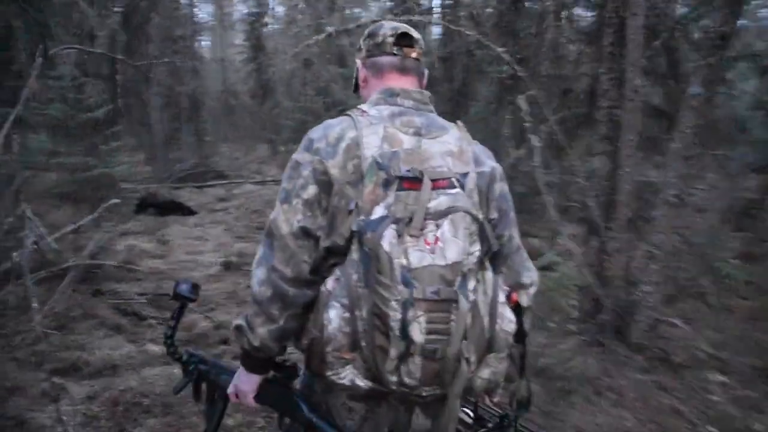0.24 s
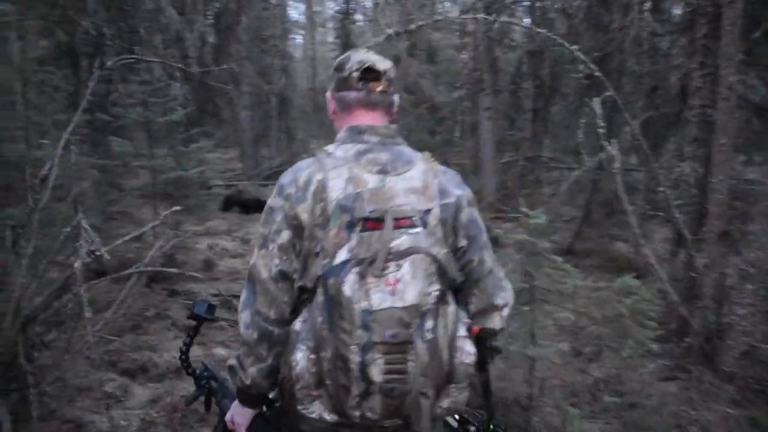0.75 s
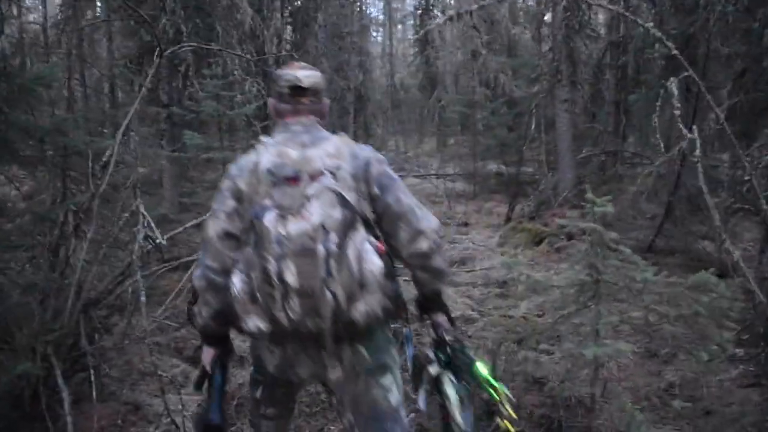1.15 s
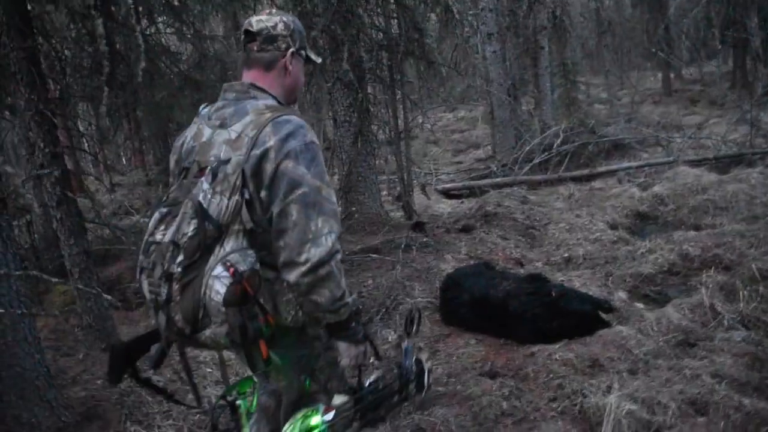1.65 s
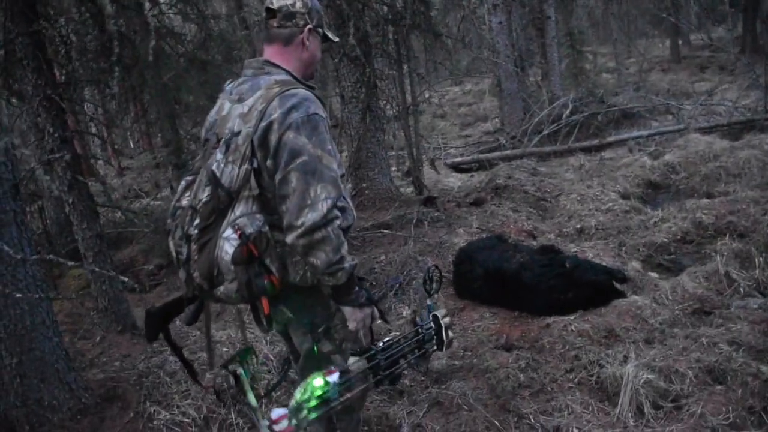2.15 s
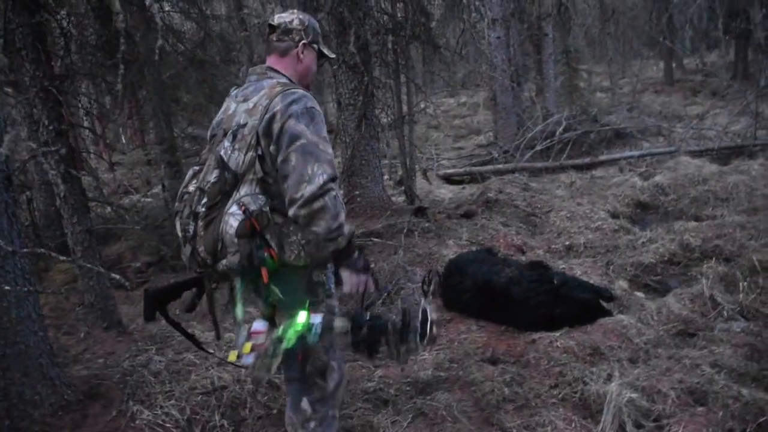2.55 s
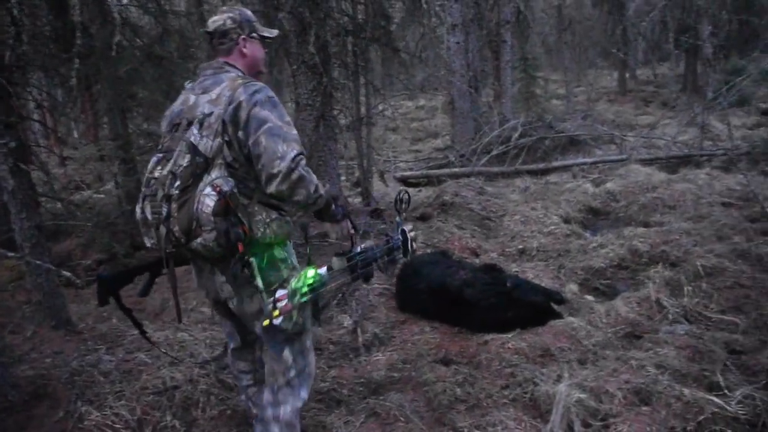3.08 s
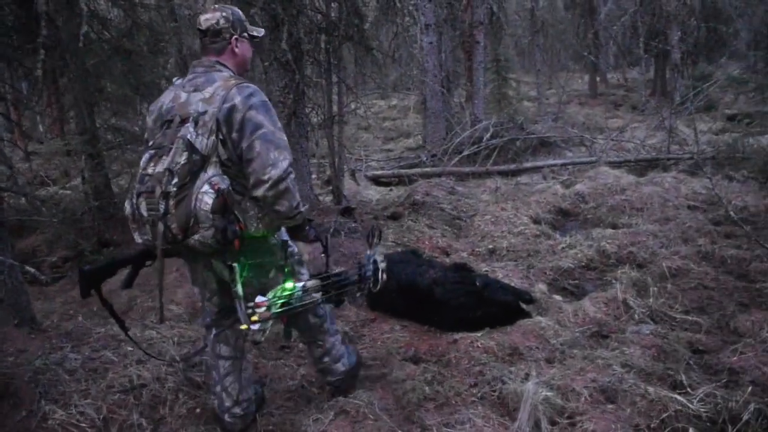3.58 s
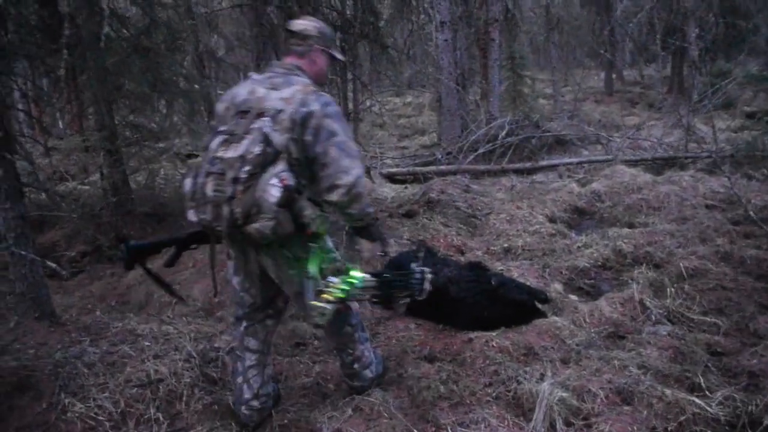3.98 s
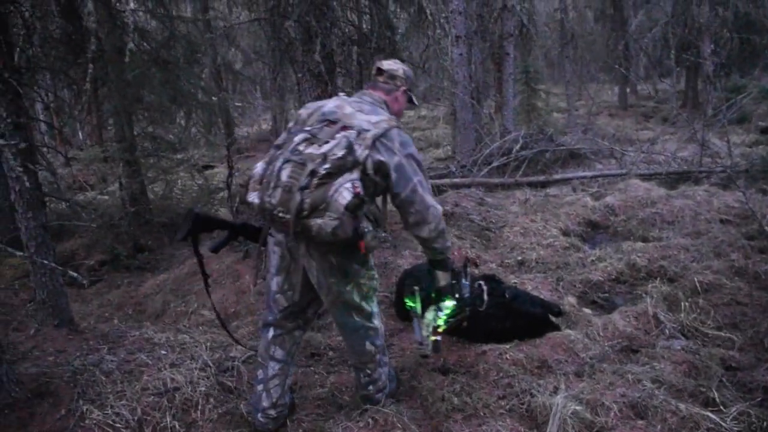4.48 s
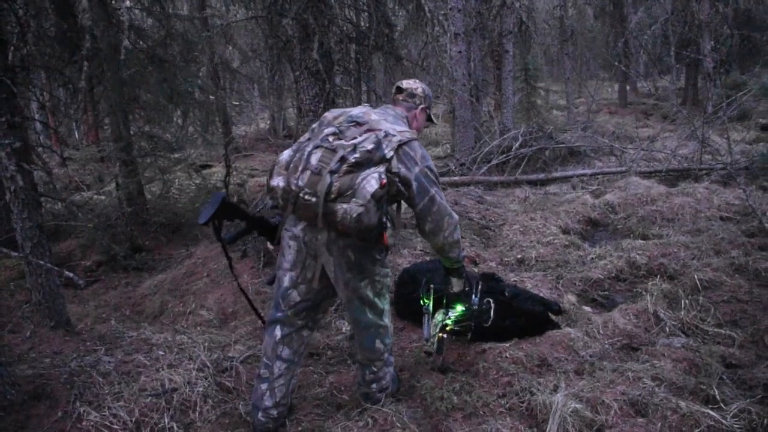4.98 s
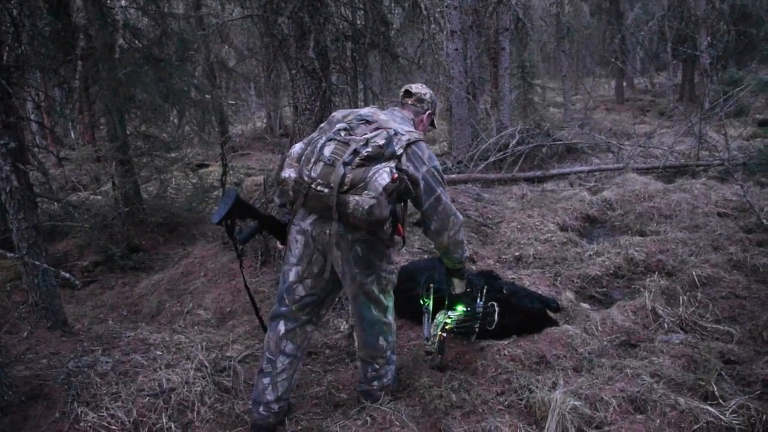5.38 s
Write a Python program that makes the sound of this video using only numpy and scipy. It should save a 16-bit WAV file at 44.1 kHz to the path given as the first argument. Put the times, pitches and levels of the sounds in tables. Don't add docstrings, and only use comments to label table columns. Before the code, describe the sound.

A hunter walks through dry grass and twigs in a quiet forest, just ahead of a hand-held camera. A very loud twig snap opens, followed by dense crunching and cracking and a second heavy snap near one second. Soft heel thumps and fainter rustles follow as the brush thins. Low handling rumble and thuds sit close at the microphone; late snaps and small strap squeaks end it over faint hiss.

```python
import sys
import numpy as np
from scipy import signal
from scipy.fft import rfft, irfft
from scipy.io import wavfile

SR = 44100
rng = np.random.default_rng(int(sys.argv[2]) if len(sys.argv) > 2 else 0)


def master(y):
    cut = np.clip(np.atleast_2d(y).T, -1, 1)
    pcm = np.round(cut * 32767)
    wavfile.write(sys.argv[1], SR, pcm.astype(np.int16))


def attenuation_scalar(level_db):
    decades = np.asarray(level_db, float) / 20
    return 10 ** decades


N = 248283

# f/Hz, width/Hz, gain
PORT = (3290, 650, 1.212)
# t/s, peak level/dB, knock level re peak/dB, knock f/Hz
MORE_KNOCKS = [
    (4.4503, -39, 8.4, 300),
    (4.4136, -32, 8, 260),
    (5.1036, -42, 6.7, 270),
    (5.1339, -43, 7.6, 310),
    (5.2, -44, 7.1, 340),
]


def rms_one(x):
    return x / np.sqrt(np.mean(x ** 2) + 1e-20)


def peak_one(x):
    return x / (np.max(np.abs(x)) + 1e-20)


def band(x, low_hz, high_hz, order=2):
    edges_hz = [low_hz, min(high_hz, .45 * SR)]
    return signal.sosfilt(signal.butter(order, edges_hz, "band", fs=SR, output="sos"), x)


def resonance(x, hz, width_hz):
    r = np.exp(-np.pi * width_hz / SR)
    zeros = np.array([1, 0, -1]) * (1 - r * r) / 2
    poles = [1, -2 * r * np.cos(2 * np.pi * hz / SR), r * r]
    return signal.lfilter(zeros, poles, x)


def drift(rate):
    r = np.exp(-80 * np.pi * rate / SR)
    white = rng.standard_normal(N // 40 + 2002)
    slow = signal.lfilter([1], [1, -2 * r, r * r], white)[2000:]
    return np.interp(np.arange(N) / 40, np.arange(len(slow)), rms_one(slow))


def coloured(spectrum):
    hz = np.fft.rfftfreq(N, 1 / SR) + 1
    points = np.array(spectrum)
    gain_db = np.interp(np.log(hz), np.log(points[:, 0]), points[:, 1])
    return rms_one(irfft(rfft(rng.standard_normal(N)) * attenuation_scalar(gain_db), N))


def grains(per_s, spread_db, clump_db):
    sizes = attenuation_scalar(spread_db * np.minimum(rng.exponential(1, N), 3.0)) * rng.choice([-1, 1], N)
    born = rng.random(N) < per_s * attenuation_scalar(clump_db * drift(45)) / SR
    return rms_one(sizes * born) + 0.32 * rng.standard_normal(N)


def crackle(per_s, low_hz, high_hz, cycles, count):
    clicks = grains(per_s, 4.6, 4.2)
    dealt = rng.integers(0, count, N)
    gust_db, tilt = 2.2, .45
    out = np.zeros(N)
    for k, hz in enumerate(np.geomspace(low_hz, high_hz, count)):
        stalk = resonance(clicks * (dealt == k), hz, hz / cycles)
        out += attenuation_scalar(gust_db * drift(9.4)) * stalk / (hz / low_hz) ** tilt
    return out


def swells(s, db, hold_s, rise_s, fade_db_per_s):
    since = np.arange(0, N + 64, 64)[:, None] / SR - s
    rise_db = 20 * np.minimum(since, 0) / rise_s
    fade_db = fade_db_per_s * np.maximum(since - hold_s, 0)
    total = 10 * np.log10(np.sum(attenuation_scalar(2 * (db + rise_db - fade_db)), axis=1) + 1e-9)
    return np.interp(np.arange(N) / 64, np.arange(len(total)), total)


def air():
    # f/Hz, level per Hz/dB
    spectrum = [(12, -36.5), (20, -12), (79, 3), (91, -13), (124, -3.5), (146, -19), (242, -11.5),
                (501, -21), (1100, -26.5), (3100, -24), (4850, -33), (12200, -29), (16200, -28)]
    return attenuation_scalar(-64) * coloured(spectrum)


def camera():
    # f/Hz, width/Hz, level/dB
    modes = [(117.4, 19, -11.5), (243.5, 46.3, 2.5), (312, 22, -2)]
    # f/Hz, level per Hz/dB
    rumble_spectrum = [(8.8, -29), (15, -0.5), (43, 1.5), (62, -13.5), (86, -12), (135, -16), (180, -17),
                       (230, -38), (400, -120)]
    # t/s, sway level/dB, rubbing level/dB, hold/s
    jolts = [(0.01, -53, -63, 0.33), (0.45, -56.5, -68, 0.65), (0.962, -48, -51.5, 0.046),
             (1.124, -57, -59, 0.13), (1.372, -46, -58, 0.021), (1.653, -52, -60.5, 0.056),
             (1.875, -48, -67, 0.032), (2.052, -44.5, -62.5, 0.037), (2.177, -49, -63.5, 0.047),
             (2.417, -47.5, -62, 0.024), (2.913, -49.5, -59, 0.033), (3.308, -54, -63, 0.03),
             (3.6, -51.5, -62, 0.055), (3.956, -57.5, -61.5, 0.06), (4.31, -66.5, -67.5, 0.23),
             (4.672, -62.5, -65, 0.2), (5.065, -84, -63, 0.12), (5.244, -57.5, -72.5, 0.029)]
    # t/s, peak level/dB, upper mode level re peak/dB
    bumps = [(1.43, -53, -13), (1.509, -54, -15), (1.658, -52.5, -10.5), (1.798, -49, -4),
             (1.872, -53, -4.5), (2.018, -47, -4), (2.08, -53.5, -25), (2.135, -47, -28), (2.384, -50, -10),
             (2.972, -51.5, -16), (3.05, -50.5, -30.5), (3.171, -59.5, -5.5), (3.662, -52, -18),
             (4.55, -58, -6), (4.698, -65.5, 9), (4.867, -53, 1.5), (4.952, -55, -1), (5.075, -47.5, 4)]
    rise_s, fade_db_per_s, sway_hz = 0.1787, 73, 31.4
    at_s, jolt_db, rub_db, hold_s = np.transpose(jolts)
    sway_db = swells(at_s, jolt_db, hold_s, rise_s, fade_db_per_s)
    body_db = swells(at_s, rub_db, hold_s, rise_s, fade_db_per_s)

    turn = 2 * np.pi * np.cumsum(sway_hz * attenuation_scalar(1.3 * drift(6.1))) / SR
    sway = drift(11.0) * np.cos(turn) + drift(7.2) * np.sin(turn)
    rumble = sway + 1.4 * coloured(rumble_spectrum)

    rubbing = grains(90, 4.5, 3.0)
    body = np.zeros(N)
    for hz, width_hz, db in modes:
        body += attenuation_scalar(db) * resonance(resonance(rubbing, hz, 3 * width_hz), hz, width_hz)

    s, peak_db, upper_db = np.transpose(bumps)
    uneven_db = 3 * rng.standard_normal(len(s))
    thuds = np.zeros(N)
    for (hz, width_hz, db), own_db in zip(modes, [uneven_db, 0, upper_db]):
        taps = np.zeros(N)
        taps[(s * SR).astype(int)] = attenuation_scalar(peak_db + db + own_db)
        softened = resonance(taps, hz, 4 * width_hz)
        thuds += resonance(softened, hz, 0.41 * width_hz) * SR / (1.9 * width_hz)
    return attenuation_scalar(sway_db) * rms_one(rumble) + attenuation_scalar(body_db) * rms_one(body) + thuds


def strap():
    # t/s, length/s
    squeaks = [
        (4.700, .075),
        (4.962, .06),
        (4.661, .021),
        (4.385, .024),
        (4.8615, .004),
        (4.918, .021),
        (5.069, .009),
    ]
    squeak_db = [-31.5, -33.5, -27, -28, -21.5, -31, -20.5]
    slips_per_s = 333
    slips = np.zeros(N)
    for (s, length), db in zip(squeaks, squeak_db):
        k = np.arange(int(length * slips_per_s) + 1)
        early, size = rng.standard_normal((2, len(k)))
        at = s + k / slips_per_s + .000012 * early
        fade_db = 15 * k / (length * slips_per_s)
        slips[(at * SR).round().astype(int)] += attenuation_scalar(db + 14.0 + 2.0 * size - fade_db)
    bright = resonance(resonance(slips, 3360, 735), 3520, 428)
    return bright + 0.033 * resonance(slips, 2460, 900)


def heels():
    # t/s, peak level/dB, start f/Hz
    landings = [
        (0.654, -40.5, 230),
        (0.954, -36.5, 190),
        (1.866, -42.5, 170.3),
        (2.061, -54.5, 170),
        (2.25, -38.5, 227),
        (2.436, -58, 222),
        (2.727, -41, 174),
        (2.904, -45.5, 131.7),
        (3.87, -47, 167),
    ]
    end_hz, sink_s, rise_s, t60_s = 50.6, 0.0133, 0.0027, .09
    t = np.arange(SR // 3) / SR
    out = np.zeros(N + SR)
    for s, db, start_hz in landings:
        sinking_hz = end_hz + (start_hz - end_hz) * np.exp(-t / sink_s)
        turn = 2 * np.pi * np.cumsum(sinking_hz) / SR
        envelope = attenuation_scalar(db - 60 * t / t60_s) * np.minimum(t / rise_s, 1)
        out[int(s * SR):][:len(t)] += envelope * np.sin(turn)
    return out[:N]


def grass():
    # t/s, crunch level/dB, blades level re crunch/dB, press/s
    treads = [(0.068, -42, -12.5, 0.074), (.3, -58.5, -7.5, 0.19), (0.599, -57.5, -3, 0.17),
              (0.869, -52, -21.5, 0.021), (0.959, -47.5, -7.5, 0.032), (1.07, -48, -8, 0.046),
              (1.16, -59, -17, 0.043), (1.25, -50, -0.5, 0.043), (1.32, -54.5, -5, 0.015),
              (1.43, -64.5, -1.5, 0.035), (1.548, -57, 1, 0.015), (1.78, -64.5, -7, 0.015),
              (1.92, -79.5, 8.5, 0.031), (2.05, -72.5, -2.5, 0.085), (2.261, -67.5, -1, 0.019),
              (2.45, -65.5, 4.5, 0.051), (2.71, -66.5, 1, 0.038), (2.921, -72, 0.5, 0.083),
              (3.09, -71.5, 2.5, 0.026), (3.16, -66.5, 3.5, 0.047), (3.34, -70, 0, 0.12),
              (3.55, -80, -6, .02), (3.62, -59.5, -3, 0.076), (3.801, -68.5, 3, 0.18),
              (4.1, -68.5, 3.5, 0.059), (4.42, -58, -3.5, 0.028), (4.47, -59, -3.5, 0.035),
              (4.68, -73.5, -11, 0.03), (4.95, -99, -21, 0.027), (5.11, -66.5, -6, 0.023),
              (1.45, -80, 1, 3.74)]
    # t/s, level/dB, hold/s
    scuffs = [(0.236, -51.5, 0.022), (0.657, -59, 0.017), (0.998, -52.5, 0.022), (1.239, -54, 0.012),
              (1.342, -62.5, 0.039), (1.58, -67, 0.023), (1.733, -67, .03), (1.905, -66.5, 0.013),
              (2.903, -70.5, 0.021), (2.938, -64.5, 0.035), (3.035, -69, .04), (3.671, -64.5, 0.016),
              (4.852, -66.5, 0.0092)]
    sink_s, lift_db_per_s = 0.17, 142
    s, db, fizz_db, press_s = np.transpose(treads)
    crunch_db = swells(s, db, press_s, sink_s, lift_db_per_s)
    blades_db = swells(s, db + fizz_db, press_s + 0.021, sink_s, 203)
    damp_db = -59.5 + 0.44 * (db + 57.5) - 0.6 * (fizz_db + 7.5)
    litter_db = swells(s, damp_db, press_s, sink_s, lift_db_per_s)
    scuff_db = swells(*np.transpose(scuffs), rise_s=0.024, fade_db_per_s=404)
    swish_db = -70.5 + 0.45 * (crunch_db + 68.0)

    scuff = crackle(2500, 480, 850, cycles=3.0, count=4)
    stalks = crackle(1500, 1904, 6300, cycles=3.2, count=6)
    crunch = stalks + PORT[2] * resonance(stalks, PORT[0], PORT[1])
    blades = crackle(3900, 6500, 7900, cycles=1.4, count=6)
    litter = crackle(700, 520, 1500, cycles=0.78, count=4)
    swish = resonance(resonance(rng.standard_normal(N), PORT[0], 2 * PORT[1]), PORT[0], PORT[1])
    layers = [(scuff_db, scuff), (swish_db, swish), (crunch_db, crunch), (blades_db, blades), (litter_db, litter)]
    return sum(attenuation_scalar(level_db) * rms_one(layer) for level_db, layer in layers)


def ticks():
    # t/s, peak level/dB
    splinter_rows = [(0.0787, -35), (0.6199, -32), (0.8436, -35), (0.9085, -33), (1.4131, -36.5),
                     (1.5689, -36), (1.5918, -42.5), (1.8654, -44.5), (1.8844, -51.5), (1.9464, -57),
                     (2.074, -45.5), (2.2347, -45.5), (2.2842, -51), (2.3031, -51), (2.375, -47),
                     (2.407, -58), (2.4704, -36.5), (2.5541, -40), (2.5873, -45), (2.7351, -51),
                     (2.7586, -43), (2.7815, -44), (2.8149, -52), (2.9344, -53.5), (3.1538, -45),
                     (3.4092, -52), (3.7576, -47), (4.0647, -48), (4.1699, -53), (4.2311, -48.5),
                     (4.3038, -52.5), (4.3242, -50), (4.4012, -37), (4.4189, -38), (4.4346, -32),
                     (4.5138, -36), (4.696, -43), (4.9154, -41.5), (4.9317, -49), (5.0368, -52)]
    # t/s, peak level/dB
    blade_rows = [(0.0307, -28), (0.1288, -12), (0.2346, -27), (0.3449, -51), (0.4509, -37), (0.4792, -43),
                  (0.62, -24.5), (0.8892, -26), (0.9098, -39), (1.1784, -26), (1.1997, -30), (1.2564, -33),
                  (1.6079, -48), (1.7351, -48), (2.6153, -33), (2.6435, -41.5), (2.9975, -49.5),
                  (3.0781, -47.5), (3.1976, -38.5), (3.2831, -50), (3.4092, -44), (3.4809, -42),
                  (3.7367, -43.5), (3.8327, -37), (3.8442, -41), (3.8711, -39), (3.9183, -34),
                  (3.9272, -45), (3.9905, -44), (3.9987, -34), (4.0283, -41), (4.0778, -46), (4.0828, -36),
                  (4.1087, -47), (4.1301, -45), (4.1814, -34), (4.304, -46), (4.4153, -20.5), (4.4193, -33),
                  (4.4497, -29), (4.6597, -43.5)]
    t60_s = 0.00091
    t = np.arange(200) / SR
    out = np.zeros(N + 400)
    for rows, low_hz, high_hz, port_gain in [(splinter_rows, 1100, 4800, 1.2), (blade_rows, 4200, 15000, 0)]:
        wisps = 0.4 * rng.standard_normal((len(rows), len(t))) * attenuation_scalar(-60 * t / t60_s)
        wisps[:, 0] += 1
        wisps = band(wisps, low_hz, high_hz)
        wisps = wisps + port_gain * resonance(wisps, PORT[0], PORT[1])
        for (s, db), wisp in zip(rows, wisps):
            out[int(s * SR):][:len(t)] += attenuation_scalar(db) * peak_one(wisp)
    return out[:N]


def wood_at(s):
    # t/s, ring f/Hz, crack f/Hz, hollow f/Hz, hollow level/dB
    woods = [(.0843, 3400, 6700, 1390, -14), (.0869, 2150, 6000, 1370, -22), (.0923, 4200, 7500, 1400, -12),
             (.095, 3100, 7000, 1400, -10), (.1012, 3300, 6000, 1300, -12), (.1289, 4570, 6200, 1400, -8),
             (.1312, 2980, 6000, 1400, -7.5), (.5813, 3530, 5750, 1300, -2), (.9525, 3260, 5800, 1300, 2),
             (1.1094, 2580, 5800, 4400, -8), (1.1695, 2700, 8000, 2000, 2),
             (1.2432, 3350, 7960, 5700, -8.5), (1.3838, 3360, 9600, 5700, -16),
             (2.2504, 3396, 8520, 1300, -5), (2.4439, 3340, 11060, 7600, 3),
             (2.6212, 2600, 10950, 7000, 1.5), (2.6996, 2690, 12970, 6200, -9.5),
             (3.5177, 3400, 9990, 4480, -9), (3.6028, 2900, 9000, 5690, -5), (3.8393, 3270, 6800, 4420, 0),
             (3.8828, 3180, 6100, 4400, 2), (3.8918, 3386, 6760, 2010, -5.5),
             (4.1815, 3285, 6520, 4410, -3), (4.4108, 3300, 6285, 2120, -12), (4.445, 3100, 6595, 2000, -9),
             (4.5, 4300, 9000, 5730, -5), (5.1013, 3000, 9900, 5600, -14), (5.1319, 2650, 10950, 5500, -3),
             (5.165, 3290, 9480, 4800, -6), (5.254, 2000, 12000, 3980, -9),
             (5.2892, 2094, 8970, 4510, -10.5)]
    row = min(woods, key=lambda wood: abs(wood[0] - s))
    return row[1:] if abs(row[0] - s) < .003 else None


def all_breaks():
    # t/s, peak level/dB, knock level re peak/dB, crack level re peak/dB, knock f/Hz
    twig_rows = [(.0833, -22, -26, -11, 530), (.0843, 6.5, -26, -12.5, 414), (.0849, 3, -21.5, -17.5, 414),
                 (.0862, -3.5, -4, -19.5, 220), (.0876, -3, -31, -19.5, 395), (.0923, -13, -11.5, -7, 766),
                 (.095, -20, -13, -12, 497.5), (.1012, -27, -12.5, -15.5, 500),
                 (.1289, -10, -11.5, -10, 503), (.1308, -16, -21, -8.5, 500), (.5813, -18, -6, -7.5, 670),
                 (.9525, -6, -7.5, -36.5, 344), (.9561, -29.5, 7.5, -34, 275),
                 (1.1094, -20.5, -10.5, 0.5, 786), (1.1695, -26, 5, 3, 1240), (1.2432, -19, -15, 5, 1150),
                 (1.3838, -17, -13, 1.5, 322), (2.2504, -19.5, -8, 3.5, 472),
                 (2.4439, -15, -11.5, 1.5, 530), (2.6212, -26, -7, 3.5, 670),
                 (2.6996, -27.5, -2.5, -5, 446.5), (3.5177, -19, -11, 12.5, 1410),
                 (3.8393, -25, -18.5, 6, 930), (3.8828, -23.5, -27, 3.5, 587), (4.4108, -8, -5, 0, 423),
                 (4.4158, -33, 6.5, -17, 377), (4.445, -18, -1, 8.5, 495), (5.1013, -18, -11.5, -1.5, 390),
                 (5.1319, -22.5, -11, 1, 559)]
    # t/s, peak level/dB, knock level re peak/dB, knock f/Hz
    stick_rows = [(0.0474, -23.5, -13, 1110), (0.1575, -32, -2.5, 490), (0.177, -43, 6, 439),
                  (0.2353, -34, 7, 483), (0.2601, -28, -19, 970), (0.345, -37, 10, 625),
                  (0.3886, -34.5, 3, 608), (0.639, -28.5, 0.5, 444), (0.6577, -27, -7.5, 289),
                  (0.742, -46.5, 13.5, 460), (0.8365, -27, -11, 1030), (0.8716, -28.5, 4, 483),
                  (0.8894, -32, -1.5, 550), (0.9459, -37.5, 11, 755), (1.0703, -26, -6, 382),
                  (1.201, -36.5, 2, 860), (1.2455, -19.5, -14.5, 770), (1.2572, -30, -3, 590),
                  (1.413, -44, 5.5, 464), (2.119, -40.5, -19, 373), (2.258, -26.5, -15, 345),
                  (3.6028, -28.5, -12.5, 1200), (3.7872, -33, -7.5, 885), (3.9983, -42, 7.5, 344),
                  (4.5, -28.5, -7.5, 560), (4.64, -41.5, -13, 700), (4.8616, -34, -4.5, 300),
                  (4.9157, -38.5, -25.5, 875), (5.0715, -49, 10, 935), (5.1424, -47, 7, 540)]
    # t/s, peak level/dB, crack level
    # re peak/dB
    stalk_rows = [(0.0202, -26, -5), (0.03, -32.5, -6), (0.0765, -25, 9), (0.0787, -31.5, -15.5),
                  (0.225, -33, -8), (0.244, -29.5, -10), (0.4344, -36.5, -5), (0.5958, -30, 12.5),
                  (0.61, -48.5, -18), (.6202, -49, -11), (0.6349, -28.5, 5), (0.792, -35.5, 3.5),
                  (0.8984, -35, 0), (0.9414, -31.5, -6), (0.993, -27.5, 3), (1.12, -26.5, 3),
                  (1.1762, -28, -7), (1.36, -42.5, 7), (1.536, -34, 0), (1.5672, -35, 5),
                  (1.9279, -44, 4), (2.2212, -40, -24.5), (2.4071, -49.5, 13), (2.4948, -43, 2.5),
                (2.5086, -43, 6.5), (2.5216, -39.5, 4.5), (2.6471, -38, 0), (3.1413, -38.5, 1.5),
                (3.3276, -39, 6.5), (3.7653, -33, 8), (3.8633, -40, 1), (3.872, -41, -4),
                (3.8914, -30.5, 13.5), (3.918, -45.5, -4), (3.9494, -42, 6), (3.9938, -36, 1.5),
                (4.0644, -53, 21.5), (4.105, -36, 13), (4.136, -38.5, 4.5), (4.1815, -34, -13.5),
                (4.2227, -45, 10.5), (4.3078, -42.5, 3), (4.3338, -49, 12), (4.356, -41, 3),
                (4.4828, -37, 3), (4.504, -30, 8), (5.054, -45, -11), (5.165, -35.5, 1.5),
                (5.254, -38.5, 6.5), (5.2894, -44, -8)]
    # t/s, peak level/dB
    straw_rows = [(0.2, -36), (0.69, -53), (0.9147, -45), (1.0294, -44), (1.2796, -28.5), (1.3291, -43),
                  (1.5869, -38.5), (2.367, -37.5), (2.74, -50.5), (2.935, -45.5), (3.0695, -48),
                  (3.5444, -45), (3.6383, -42), (4.1498, -38.5), (4.408, -30), (4.4662, -38), (4.5493, -47),
                  (4.5899, -40), (5.037, -39.5), (5.1887, -49.5), (5.2211, -46.5)]
    stick_crack_db, stalk_knock_db, stalk_knock_hz = -24, -10, 503
    sticks = [(s, db, knock_db, stick_crack_db, hz) for s, db, knock_db, hz in stick_rows]
    more_knocks = [(s, db, knock_db, stick_crack_db, hz) for s, db, knock_db, hz in MORE_KNOCKS]
    stalks = []
    for s, db, crack_db in stalk_rows:
        knock_hz = stalk_knock_hz * attenuation_scalar(8 * rng.uniform(-0.29, 1))
        stalks.append((s, db, stalk_knock_db, crack_db, knock_hz))
    straws = [(s, db - 1.5, stalk_knock_db, 2.5, stalk_knock_hz) for s, db in straw_rows]
    return twig_rows + sticks + stalks + straws + more_knocks


def snap_ring(burst, crack_db, ring_hz, wood):
    width_hz = (.17 if wood else .25) * ring_hz
    low_hz = np.clip(1050 * attenuation_scalar(-0.45 * crack_db), 700, 2000)
    ring = resonance(burst, ring_hz, width_hz)
    ring = ring + (.45 if wood else 1.0) * band(burst, low_hz, 3580, order=1)
    ring = band(ring, low_hz, 14000)
    return ring + (.2 if wood else 0.64) * resonance(ring, PORT[0], PORT[1])


def snap_crack(click, spray, settle, crack_db, wood):
    top_hz = max(14000 * attenuation_scalar(0.089 * crack_db), 6000)
    crack = band(click + 0.035 * spray + 0.005 * settle, 1500, top_hz, order=1)
    crack = band(crack, 2900, 23000)
    if wood:
        crack = crack + 1.8 * resonance(crack, wood[1], 0.42 * wood[1])
    return crack


def snap_knock(t, click, spray, knock_hz, rise_s, wood):
    lag_s = .0008 if wood else 0
    push = np.exp(-np.abs(t - rise_s - lag_s) / 0.00029) + 0.38 * spray
    knock = resonance(push, knock_hz, 0.96 * knock_hz)
    knock = knock + 0.96 * band(push, 150, 2100, order=1)
    knock = knock + 0.52 * resonance(push, 225, 130)
    knock = knock + 0.8 * resonance(push + 0.1 * click, 1100, 700)
    sag_hz = 82.8 + knock_hz * np.exp(-t / 0.0056)
    sag = np.sin(2 * np.pi * np.cumsum(sag_hz) / SR) * attenuation_scalar(-60 * t / .06)
    return peak_one(knock) + 0.042 * sag


def twigs():
    size, rise_s = 5000, 0.0003
    t = np.arange(size) / SR
    out = np.zeros(N + size)
    rows = all_breaks()
    draws = rng.standard_normal((len(rows) - len(MORE_KNOCKS), 2, size))
    draws = np.concatenate([draws, draws[-len(MORE_KNOCKS):]])
    for (s, db, knock_db, crack_db, knock_hz), (white, luck) in zip(rows, draws):
        wood = wood_at(s)
        ring_hz = wood[0] if wood else 3100 * attenuation_scalar(1.15 * white[-1])
        brittle_db = max(crack_db, 0)
        spray_t60 = 0.032 * attenuation_scalar(0.0072 * (db + 30.0))
        spray = white * np.abs(luck) ** 2.0 * attenuation_scalar(-60 * t / spray_t60) * np.minimum(t / 0.0012, 1)
        click_t60 = 0.0035 * attenuation_scalar(-0.3 * brittle_db)
        click = white * attenuation_scalar(-60 * np.maximum(t - rise_s, 0) / click_t60) * np.minimum(t / rise_s, 1) ** 2
        if wood:
            click, spray = 0.58 * click, 0.72 * spray
        click[int(rise_s * SR)] += 3.5
        settle = luck * np.abs(white) * attenuation_scalar(-60 * t / 0.21) * np.minimum(t / 0.0019, 1)
        clean = attenuation_scalar(-0.9 * brittle_db)
        spray = clean * spray
        settle = clean * settle * (0.54 if wood else 1)

        ring = snap_ring(click + 0.11 * spray + 0.0065 * settle, crack_db, ring_hz, wood)
        crack = snap_crack(click, spray, settle, crack_db, wood)
        knock = snap_knock(t, click, spray, knock_hz, rise_s, wood)
        snap = peak_one(ring) + attenuation_scalar(crack_db) * peak_one(crack) + attenuation_scalar(knock_db) * peak_one(knock)
        if wood:
            snap = snap + (attenuation_scalar(wood[3]) - 1) * resonance(snap, wood[2], 0.41 * wood[2])
        lag = int(SR * (0.001 + 0.0014 * abs(luck[-1])))
        snap[lag:] += 0.05 * snap[:-lag].copy()
        at = max(int((s - rise_s - .00015) * SR), 0)
        out[at:at + size] += attenuation_scalar(db) * snap
    return out[:N]


def scene():
    mix = air() + camera() + strap() + heels() + grass() + ticks() + twigs()
    return mix[None]


def roll_off(x):
    return signal.sosfilt(signal.butter(12, 16310, fs=SR, output="sos"), x)


def record(dry):
    clipped = np.clip(dry, -1, 1)
    cut = signal.sosfilt(signal.cheby2(14, 60, 16800, fs=SR, output="sos"), clipped)
    return roll_off(cut)


dry = scene()
out = record(dry)
master(out)
```